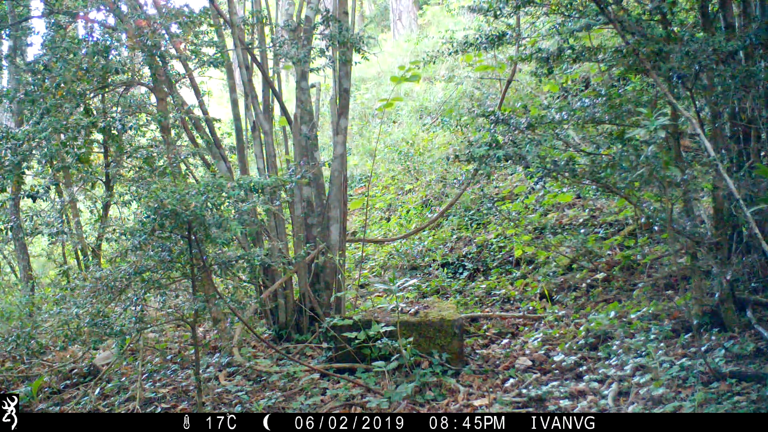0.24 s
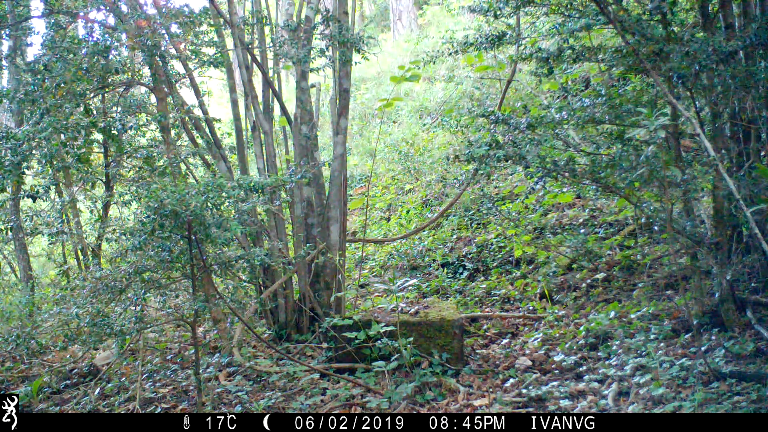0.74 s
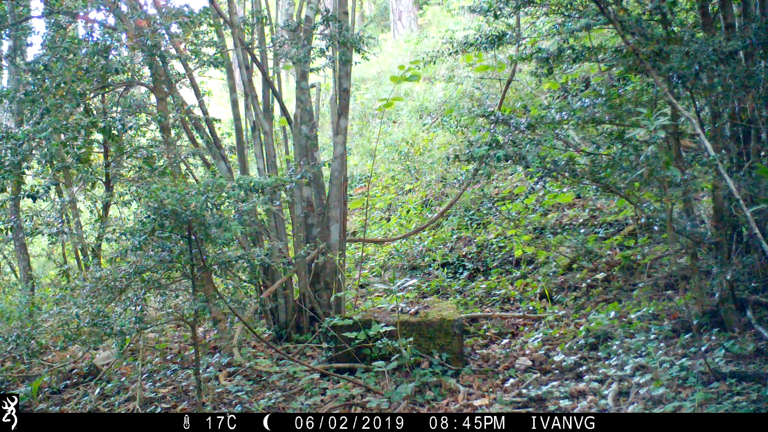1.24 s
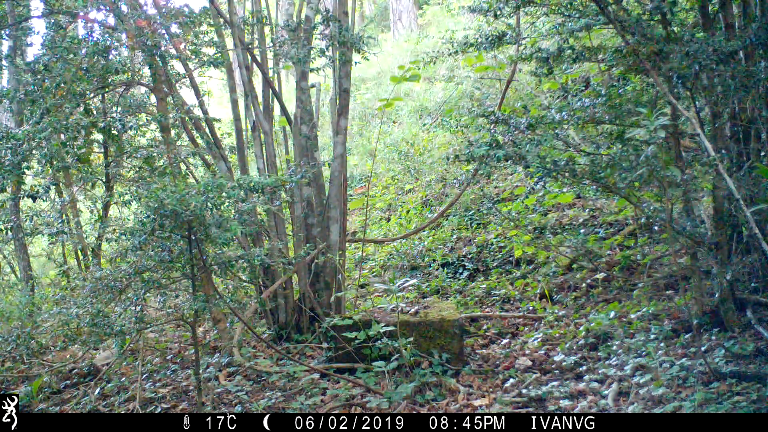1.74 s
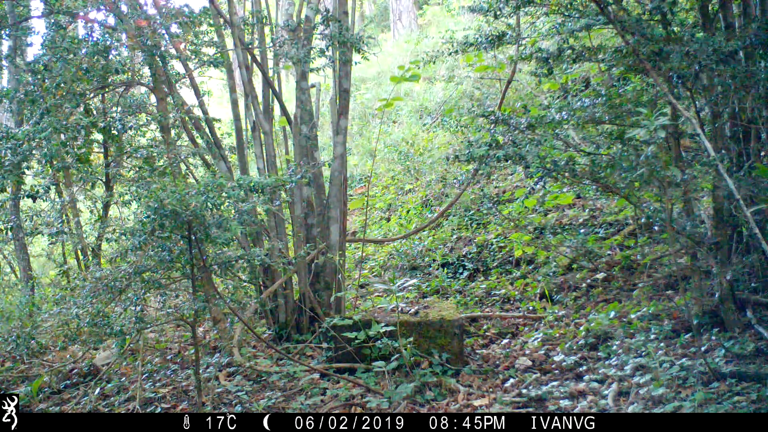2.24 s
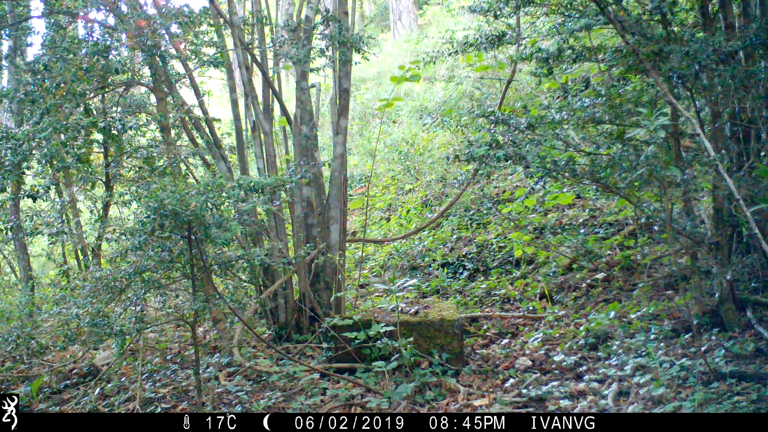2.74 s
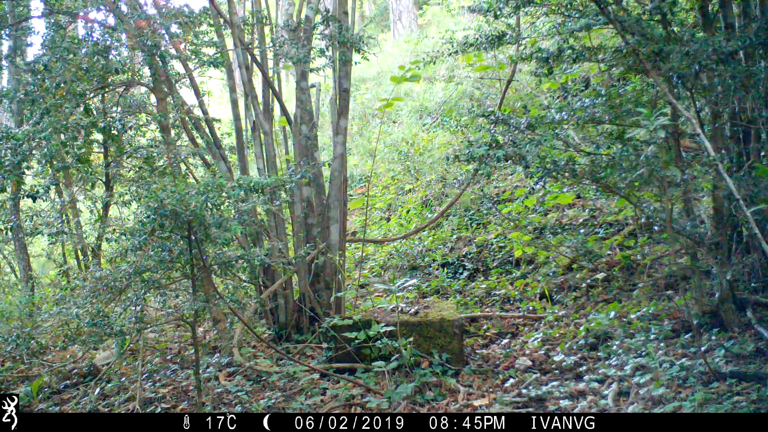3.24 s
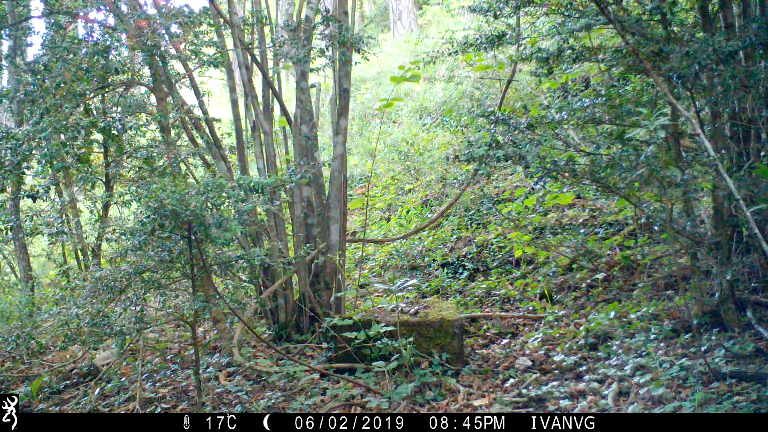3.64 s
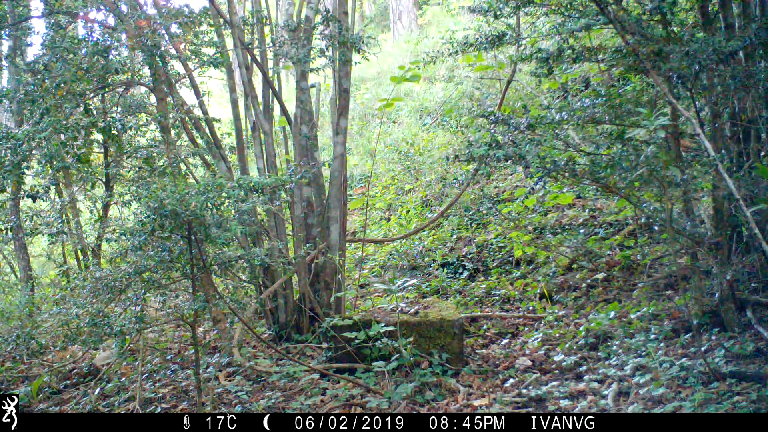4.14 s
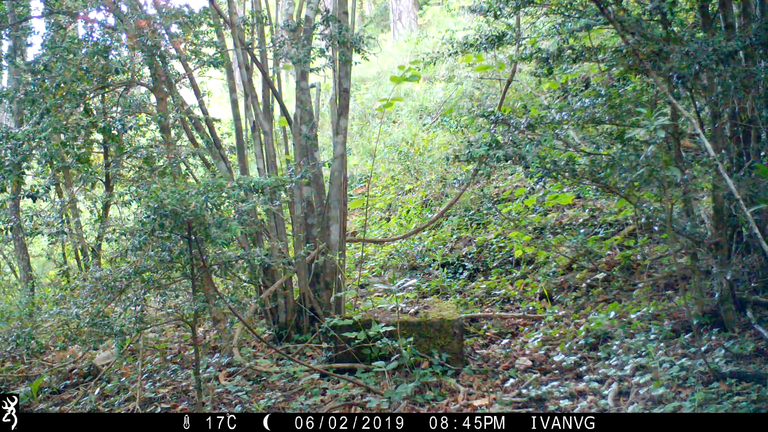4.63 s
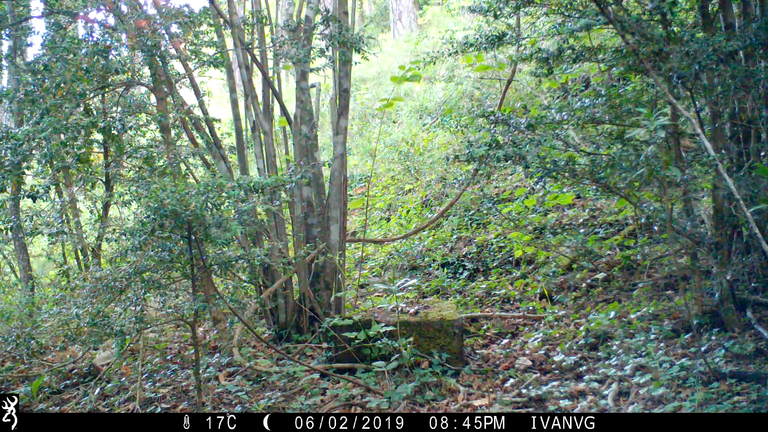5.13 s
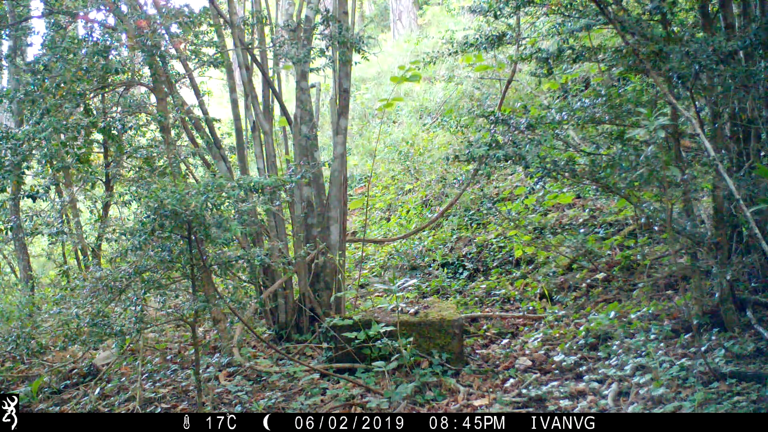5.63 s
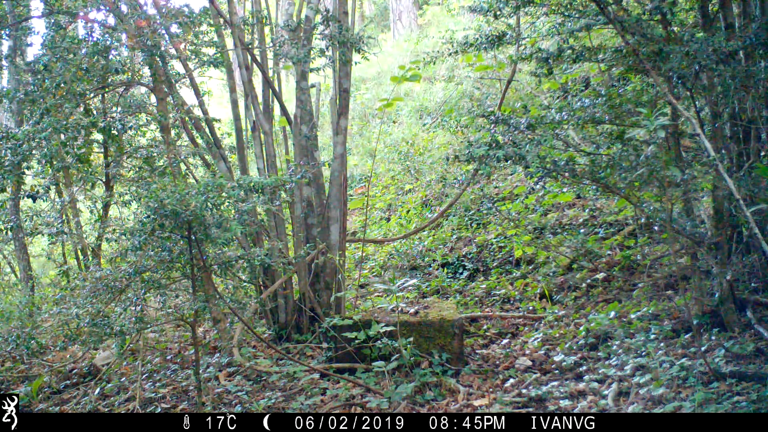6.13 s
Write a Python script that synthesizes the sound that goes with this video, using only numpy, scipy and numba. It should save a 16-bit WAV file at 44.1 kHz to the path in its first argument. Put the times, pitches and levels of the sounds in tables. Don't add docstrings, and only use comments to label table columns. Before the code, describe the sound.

A deer barks hoarsely as it bounds off through crackling leaf litter, barks echoing through the wood, then birdsong and one last longer bark.

```python
import sys
import numpy as np
from scipy import signal
from scipy.fft import rfft, irfft, next_fast_len
from scipy.io import wavfile
from scipy.ndimage import uniform_filter1d, map_coordinates
from numba import njit

SR = 44100
rng = np.random.default_rng(int(sys.argv[2]) if len(sys.argv) > 2 else 0)


def boost_factor(decibels):
    exponent = np.asarray(decibels, float) / 20
    return 10 ** exponent


def int16_out(signal):
    q = np.round(np.clip(np.atleast_2d(signal).T, -1, 1) * 32767)
    wavfile.write(sys.argv[1], SR, q.astype(np.int16))


N = 281358


def unit(x):
    return x / np.sqrt(np.mean(x ** 2) + 1e-20)


def along(points, hz):
    f, v = np.transpose(points)
    return np.interp(np.log(hz + 1), np.log(f + 1), v)


def filtered(x, response):
    m = next_fast_len(len(x) + 8192)
    return irfft(rfft(x, m) * response(np.fft.rfftfreq(m, 1 / SR)), m)[:len(x)]


def wobble(count, rate):
    knots = rng.standard_normal(count // 20 + 9)
    return map_coordinates(knots, [np.arange(count) * np.minimum(rate, 2000) / SR])


def add(out, x, s):
    i = round(s * SR)
    x = x[max(-i, 0):][:max(N - i, 0)]
    out[max(i, 0):][:len(x)] += x


def hush():
    # frequency in Hz, level in dB per Hz.
    air_tone = [(15, -56.5), (25, -27.5), (120, -15), (313, -9.5), (500, -5.5), (1040, -3), (1700, -6),
                (2600, -9), (3300, -12.5), (4250, -20), (5000, -29), (6000, -37), (7200, -49), (9000, -66)]
    # time in seconds, level in dB.
    air_level = [(0.0, -55), (6.38, -56)]
    z = signal.stft(rng.standard_normal(N), nperseg=512)[2]
    patches = uniform_filter1d(uniform_filter1d(rng.standard_normal(z.shape), 6, 0), 12, 1)
    x = signal.istft(z * boost_factor(0.96 * unit(patches)), nperseg=512)[1][:N]
    s, db = np.transpose(air_level)
    swell_db = np.interp(np.arange(N) / SR, s, db) + 0.22 * wobble(N, 16.0)
    return boost_factor(swell_db) * unit(filtered(x, lambda f: boost_factor(along(air_tone, f))))


def whine():
    skips = [1.035, 1.75, 3.475, 3.752, 4.26, 5.19]
    line_hz, field_hz, field_s = 7796.5, 59.3, 3.304
    t = np.arange(N) / SR
    flips = np.sign(np.sin(np.pi * field_hz * (t - field_s)))
    tone = flips * np.sin(2 * np.pi * line_hz * t)
    broken = sum(np.exp(-((t - s) / 0.011) ** 4) for s in skips)
    fizz = unit(filtered(rng.standard_normal(N), lambda f: np.exp(-((f - 7950) / 350) ** 2)))
    return boost_factor(-81) * ((1 - broken) * tone + 0.48 * broken * fizz)


@njit
def resonate(x, hz, width_hz):
    y, r = np.zeros(len(x)), np.exp(-np.pi * width_hz / SR)
    for i in range(2, len(x)):
        push = (1 - r * r) / 2 * (x[i] - x[i - 2])
        y[i] = push + 2 * r * np.cos(2 * np.pi * hz[i] / SR) * y[i - 1] - r * r * y[i - 2]
    return y


def throat(x, centres_hz, levels_db, gape, leak_db):
    widths_hz = [230, 182, 400, 350, 1200]
    # frequency in Hz, level in dB.
    voice_tilt = [(150, -40), (350, -8), (500, 0.5), (1000, 6), (2500, 0), (3500, -14), (5000, -27.5),
                  (7000, -45.5), (9000, -55), (12000, -72)]
    rings = 0
    for centre, width, db in zip(centres_hz, widths_hz, levels_db):
        once = resonate(x, centre, gape * width)
        rings = rings + boost_factor(db) * resonate(once, centre, gape * width)
    return unit(filtered(rings - boost_factor(leak_db) * x, lambda f: boost_factor(along(voice_tilt, f))))


def bark(row, mouth, strengths, rough, third_db, gape, leak_db, rasp_db):
    # time in seconds, pitch in Hz.
    pitch_arch = [(5.6, 177.8), (5.686, 218.2), (5.744, 218.1), (5.886, 198.2), (5.92, 177.7), (5.96, 167)]
    start, attack_s, held, top_db, pitch_hz = row
    running = start < pitch_arch[0][0] - 1
    slow = 1 if running else 1.74
    t = np.arange(start, held + slow * .07, 1 / SR)
    age, after = t - start, (t - held).clip(0) / slow

    effort_db = top_db - 19 * np.exp(-age / attack_s) - 10 * age - 178 * after
    slack_db = effort_db - effort_db.max()

    hz = pitch_hz - 30 * age - 380 * after if running else np.interp(t, *np.transpose(pitch_arch))
    turns = np.cumsum(hz) / SR
    shaky = turns + .08 * wobble(len(t), 90)
    pulses = np.diff(np.floor(shaky), prepend=0).clip(0) * boost_factor(1.9 * wobble(len(t), 120))
    gate = 0.44 + np.exp(-3 * (shaky % 1))
    rasp = rng.standard_normal(len(t)) * gate * boost_factor(1.54 * wobble(len(t), 60))
    source = np.sqrt(1 - rough) * unit(pulses) + np.sqrt(rough) * unit(rasp)

    jaw_hz, tongue_hz, lips_hz, teeth_hz, closing = mouth
    snap = np.exp(-age / 0.034)
    shut = 1 - closing * age
    centres_hz = [jaw_hz * shut, tongue_hz + 0 * t, lips_hz * shut, teeth_hz * (1 + 0.082 * snap), 3950 + 0 * t]
    *low_db, snap_db, pure_db = strengths
    levels_db = [*low_db, -20 + snap_db * snap, rasp_db + slack_db]
    hoarse_db = effort_db - 1.0 + 1.58 * wobble(len(t), 68.55)
    voice = boost_factor(hoarse_db) * throat(source, centres_hz, levels_db, gape, leak_db)

    pure = np.sin(2 * np.pi * turns)
    pure += boost_factor(-5.0) * np.sin(2 * np.pi * 2 * turns)
    pure += boost_factor(third_db) * np.sin(2 * np.pi * 3 * turns)
    pure *= np.sqrt(2) * boost_factor(pure_db + 0.69 * slack_db) * (1 - np.exp(-(age / .016) ** 2))
    fade = np.clip(np.minimum(age / 0.0067, (t[-1] - t) / .025), 0, 1)
    return start, fade * (voice + pure)


def echoes(x, near_db, far_db, near_t60):
    # frequency in Hz, t60 in seconds.
    deep_wood = [(150, 0.79), (600, 1.48), (1200, 1.16), (2500, 0.93), (5000, 0.59), (9000, .3)]
    # delay in seconds, spread in seconds, level in dB.
    hillside = [(0.618, 0.16, -32)]
    hz, t, z = signal.stft(rng.standard_normal(SR * 5 // 4), SR, nperseg=256)
    hz = hz[:, None]
    shape = boost_factor(near_db - 60 * t / near_t60) / np.sqrt(near_t60)
    shape = shape + boost_factor(far_db - 60 * t / along(deep_wood, hz))
    for delay, spread, db in hillside:
        shape = shape + boost_factor(db) * np.exp(-((t - delay) / spread) ** 2) * (hz < 2500)
    tail = signal.istft(z * shape * (hz > 300), SR, nperseg=256)[1] * np.sqrt(np.log(1e6) / SR)
    return signal.fftconvolve(x, tail)


def deer():
    # start in seconds, attack in seconds, held until in seconds, effort in dB, pitch in Hz.
    bark_rows = [
        (-.15, 0.011, .064, -20.5, 184.2),
        (.566, 0.0099, .70, -27, 178.3),
        (1.2, 0.0042, 1.255, -28, 152),
        (1.829, 0.0061, 2.005, -25.5, 177.3),
        (2.266, 0.017, 2.305, -31.5, 177.7),
        (5.602, 0.038, 5.89, -20.5, 217),
    ]
    # jaw, tongue, lips and teeth resonances in Hz, closing of jaw and lips as share per second.
    mouth_rows = [(783, 1230, 2065, 3000, 0.83), (544, 1036, 1720, 2520, .1), (533, 993, 1850, 2350, .05),
                  (712, 1085, 2170, 2480, 1), (530, 1005, 2020, 2450, 0.34), (693, 1322, 1940, 2850, 0.015)]
    # jaw, tongue, lips, bright snap at the start and clean fundamental, all in dB.
    strength_rows = [(0.5, 3.5, 3.5, 12, -55), (-7, 1, -0.5, 36, -55.5), (1.5, 4, 3.5, 31.5, -59.5),
                     (-1.5, 2, -3, -2, -61), (1.5, 1.5, 0.5, 32, -73), (0.5, 7, 3.5, 4, -65)]
    # roughness 0-1, clean third harmonic in dB, gape as a factor on widths,
    # leak between resonances in dB, high rasp in dB.
    voicing_rows = [(.8, 8, 1.5, -18, -22), (.55, 15, .9, -24, -18), (.65, 6, 1.05, -27, -26),
                    (.5, 8, .9, -23, -22), (.55, 13, .95, -25, -26), (.75, 0, 1.25, -21, -6.5)]
    out = np.zeros(N)
    for row, mouth, strengths, voicing in zip(bark_rows, mouth_rows, strength_rows, voicing_rows):
        start, x = bark(row, mouth, strengths, *voicing)
        add(out, x, start)
        add(out, echoes(x, near_db=-11.0, far_db=-11.0, near_t60=0.37), start + .006)
    return out


def bounds():
    # time in seconds, level in dB, thud in Hz.
    hoof_rows = [(.11, -74, 73.5), (.165, -59.5, 74.5), (0.547, -49, 289), (0.548, -60.5, 74.8),
                 (.595, -77, 74.6), (.635, -57, 73.8), (1.115, -67, 90.5), (1.159, -59, 90.7),
                 (1.194, -56.5, 80), (1.785, -61, 75), (1.822, -50, 337), (1.825, -60.5, 75.7),
                 (1.874, -57, 76), (2.225, -56.5, 75.1), (2.229, -61.5, 230), (2.265, -61, 75),
                 (2.305, -62, 75.6)]
    # crest in seconds, rms level in dB, rise in seconds, t60 in seconds.
    litter_rows = [(.232, -61.5, 0.0052, 0.14), (.335, -67, 0.027, 0.13), (.395, -57, 0.013, 0.26),
                   (.58, -56, 0.027, .31), (.655, -51.5, 0.0035, .2), (0.744, -57.5, 0.04, .41),
                   (1.14, -60.5, 0.022, 0.18), (1.275, -60.5, 0.025, .24), (1.816, -69, 0.013, .24),
                   (1.95, -65, 0.037, 0.62), (2.24, -62, 0.056, 0.34), (2.58, -59, .008, 0.22),
                   (2.952, -70, 0.058, .51)]
    # frequency in Hz, level in dB.
    leaf_tone = [(300, -42), (1500, -7.5), (3500, 9), (5000, -4), (6500, -11.5), (8000, -24.5),
                 (12000, -30), (15000, -37)]
    out, level, t = np.zeros(N), np.zeros(N), np.arange(SR // 2) / SR
    for s, db, hz in hoof_rows:
        push = (t / 0.0081) * np.exp(1 - t / 0.0056)
        add(out, boost_factor(db) * np.sin(2 * np.pi * hz * t) * push, s - .012)
    for s, db, rise, t60 in litter_rows:
        swell = np.exp(-((.1 - t).clip(0) / rise) ** 2)
        add(level, boost_factor(db - 60 * (t - .1).clip(0) / t60) * swell, s - .1)
    snaps_db = 2.2 * rng.exponential(size=N // 20 + 1).repeat(20)[:N]
    crackle = rng.standard_normal(N) * boost_factor(snaps_db)
    return out + level * unit(filtered(crackle, lambda f: boost_factor(along(leaf_tone, f))))


def birds():
    # start in seconds, level in dB.
    thrush_starts = [(2.331, -70.5), (2.83, -65.5), (3.37, -62.5), (3.88, -62), (4.396, -62), (4.896, -62),
                     (5.485, -63.5), (6.09, -62.5)]
    # seconds after its start, length in seconds, start Hz, end Hz, level in dB.
    clear_notes = [
        (-.01, .085, 2305, 3547, 5),
        (.06, .11, 3600, 3530, 1),
        (.37, .08, 3500, 3470, -12),
    ]
    buzzy_notes = [
        (0, 0.056, 2550, 2920, 4),
        (0.108, 0.128, 2935, 3130, -2.5),
    ]
    # start in seconds, length in seconds, pitch in Hz,
    # level in dB.
    thin_notes = [(3.25, 0.26, 3950, -69), (3.5, 0.3, 4000, -75), (3.51, 0.121, 4580, -74),
                  (3.97, 0.077, 4570, -77), (4.09, 0.13, 4550, -77.5), (4.42, 0.23, 8610, -91),
                  (4.43, 0.217, 4545, -79), (4.81, 0.04, 4530, -69), (4.818, 0.066, 4387, -49.5),
                  (5.33, .23, 4530, -80.5), (5.72, .05, 7190, -76)]
    sweet_notes = [(3.26, 0.068, 4050, -67), (4.894, 0.17, 4355, -62), (4.905, 0.083, 3944, -53.5),
                   (4.995, 0.057, 3950, -57), (5.096, .088, 3835, -61.5), (5.23, 0.18, 3650, -68.5),
                   (5.915, 0.12, 6770, -81.5), (6.03, 0.05, 7390, -82), (6.168, 0.11, 6890, -78)]
    harsh_notes = [(4.58, 0.13, 8310, -85), (4.83, 0.54, 4190, -62), (6.04, .086, 8180, -84),
                   (6.132, 0.092, 6450, -72.5), (6.132, 0.14, 5380, -76.5), (6.257, 0.08, 5080, -63.5),
                   (6.262, .092, 4480, -60)]
    drooping_notes = [(4.02, .1, 3770, -66), (5.57, .12, 6950, -84)]

    phrase = [(*note, 28) for note in clear_notes] + [(*note, 300.3) for note in buzzy_notes]
    song = []
    for s, db in thrush_starts:
        for at, length, start_hz, end_hz, own_db, blur_hz in phrase:
            song.append((s + at, length, start_hz, end_hz, db + own_db, blur_hz))
    # notes, end pitch over start pitch, blur in Hz.
    for notes, slide, blur_hz in [(thin_notes, 0.98, 13), (sweet_notes, 0.94, 90),
                                  (harsh_notes, 0.89, 490), (drooping_notes, 0.89, 160)]:
        song += [(s, length, hz, hz * slide, db, blur_hz) for s, length, hz, db in notes]

    out = np.zeros(N)
    for s, length, start_hz, end_hz, db, blur_hz in song:
        u = np.arange(0, 1, 1 / (length * SR))
        turns = np.cumsum(start_hz + (end_hz - start_hz) * u) / SR
        scatter = wobble(len(u), 2.5 * blur_hz) + 1j * wobble(len(u), 1.4 * blur_hz)
        flutter = 1 + blur_hz / 30 * scatter
        whistle = unit((flutter * np.exp(2j * np.pi * turns)).real)
        add(out, boost_factor(db) * whistle * np.sin(np.pi * u ** .7) ** .6, s)
    return boost_factor(-4.5) * (out + echoes(out, near_db=1, far_db=-4, near_t60=.55)[:N])


def scene():
    return (deer() + bounds() + birds() + hush())[None]


def top_cut(x):
    return signal.sosfilt(signal.butter(12, 15720, fs=SR, output="sos"), x)


def record(dry):
    fade_in = (np.arange(N) / SR / .00007).clip(0, 1)
    hiss = boost_factor(-87) * rng.standard_normal(N)
    x = dry[0] * fade_in + hiss + whine()
    mix = filtered(x, lambda f: f < 15720)[None]
    return top_cut(mix)


dry = scene()
out = record(dry)
int16_out(out)
```